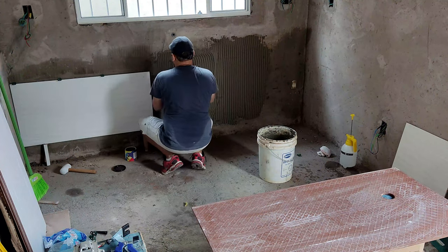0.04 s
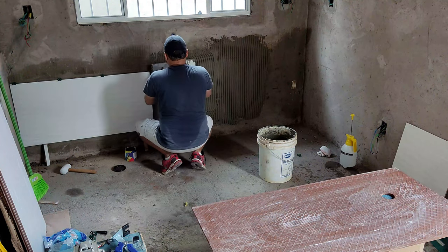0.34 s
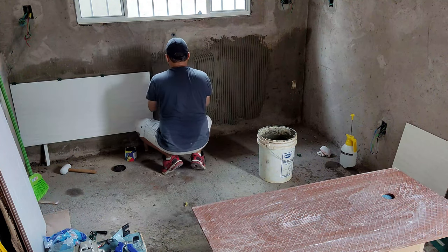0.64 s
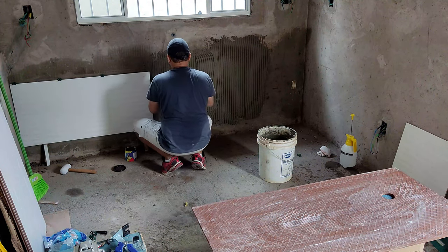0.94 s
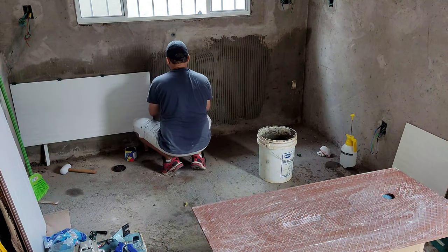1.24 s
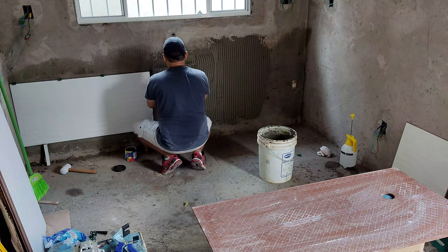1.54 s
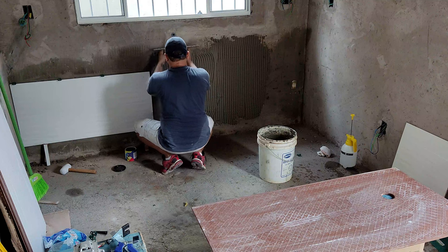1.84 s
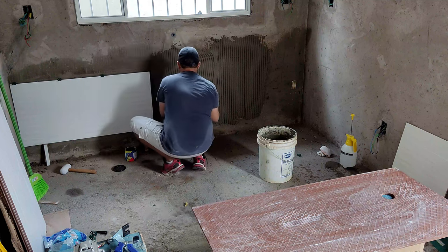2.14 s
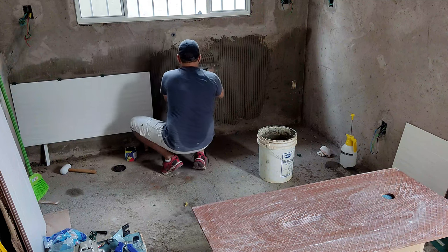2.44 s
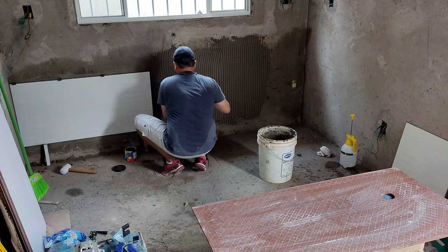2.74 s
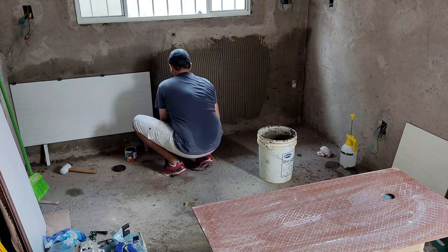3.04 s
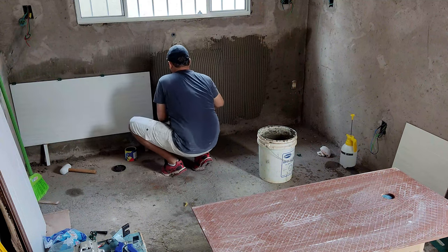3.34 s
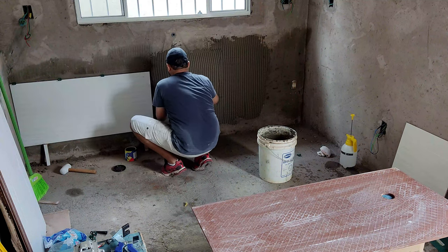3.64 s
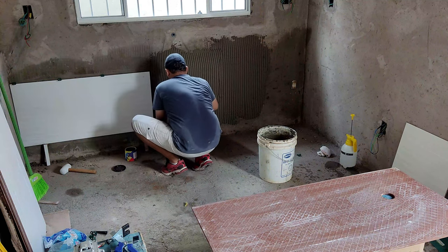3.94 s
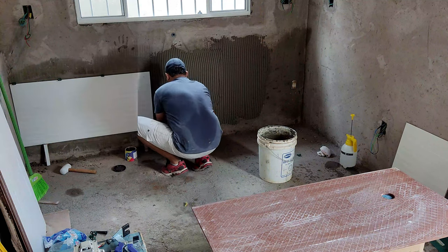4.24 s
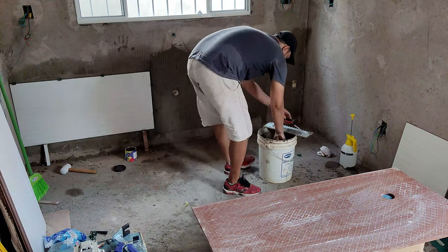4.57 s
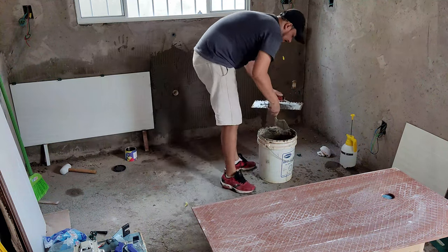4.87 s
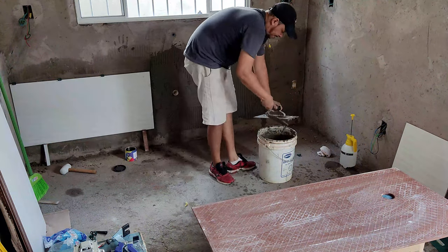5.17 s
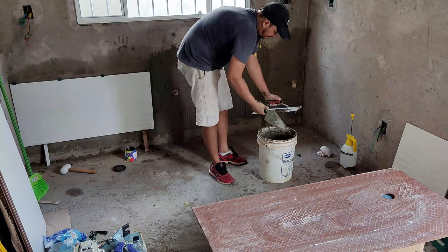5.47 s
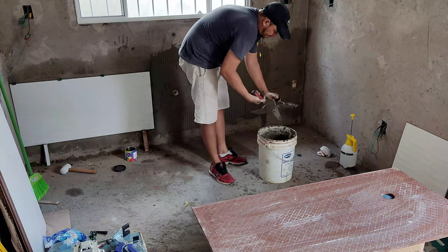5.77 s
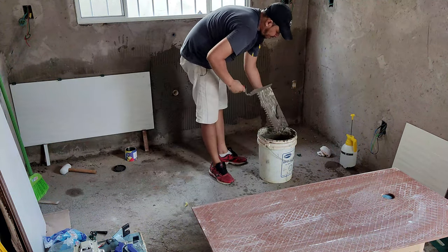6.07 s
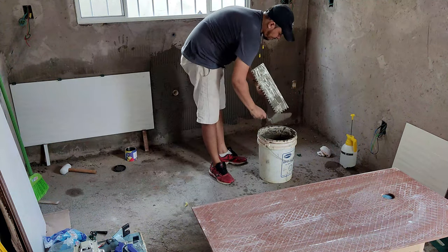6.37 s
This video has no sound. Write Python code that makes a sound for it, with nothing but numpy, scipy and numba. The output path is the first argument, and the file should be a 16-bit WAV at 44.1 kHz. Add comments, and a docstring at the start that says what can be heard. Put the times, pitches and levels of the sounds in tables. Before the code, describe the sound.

A notched steel trowel scrapes gritty mortar across a wall, then two trowels scrape and clink together in a bare room.

```python
"""Tiler in a bare plastered room

A few metres from two microphones, a notched steel trowel combs sandy mortar onto the wall: sand cracks, steel
rasps and wet mortar drags as the blade sticks and slips. The sound drops out for a moment; after a dull thump,
the tiler scrapes one trowel with another over the bucket and the blades clink. Low rumble from outdoors booms
in the room; each microphone has its own treble resonance."""
import sys
import numpy as np
from scipy import signal
from scipy.fft import rfft, irfft, next_fast_len
from scipy.io import wavfile
from scipy.ndimage import uniform_filter1d
from numba import njit

SR = 44100
rng = np.random.default_rng(int(sys.argv[2]) if len(sys.argv) > 2 else 0)


def log_audio(samples):
    """Write samples as a 16-bit WAV file to the path given in sys.argv[1]."""
    # one column per channel
    frames = np.atleast_2d(samples).T
    # limit to full scale, then quantise
    limited = np.clip(frames, -1, 1)
    pcm = np.round(limited * 32767).astype(np.int16)
    wavfile.write(sys.argv[1], SR, pcm)


N = 282681
TIME = np.arange(N) / SR


def from_db(db):
    """Decibels to gain."""
    return 10 ** (np.asarray(db) / 20)


def unit_power(x):
    """Scale to a mean square of one."""
    return x / np.sqrt(np.mean(x ** 2) + 1e-20)


def decay(t, t60):
    """A fade that loses 60 dB in t60 seconds."""
    return np.exp(-np.log(1000) * t / t60)


def in_time(curve):
    """Read a (time, value) curve at every sample."""
    return np.interp(TIME, *np.transpose(curve))


def at_hz(curve, hz):
    """Read a (frequency, value) curve on a log-frequency axis."""
    frequencies, values = np.transpose(curve)
    return np.interp(np.log(np.maximum(hz, 1)), np.log(frequencies), values)


def colour(x, spectrum):
    """Filter a steady signal by a spectral shape, then scale it to unit power."""
    size = next_fast_len(N)
    gain = from_db(at_hz(spectrum, np.arange(size // 2 + 1) * SR / size))
    return unit_power(irfft(rfft(x, size) * gain, size)[..., :N])


def drift(rate_hz):
    """Smooth random wander with a spread of about one."""
    hop, settle = 40, 2000
    pole = np.exp(-2 * np.pi * rate_hz * hop / SR)
    noise = rng.standard_normal(N // hop + settle + 2)
    slow = signal.lfilter([1], [1, -2 * pole, pole * pole], noise)[settle:]
    return np.interp(np.arange(N) / hop, np.arange(len(slow)), unit_power(slow))


# Spectral shape of the empty room's air: (frequency [Hz], relative level [dB])
AIR_SPECTRUM = [(15, 0), (35, 6.5), (60, -1), (120, 0), (200, -9.5), (320, -13), (500, -20), (1000, -21.5),
                (2000, -29.5), (4000, -28.5), (14000, -43.5)]


def still_air(level_db):
    """Room tone: steady, deep noise, separate at each microphone."""
    return from_db(level_db) * colour(rng.standard_normal((2, N)), AIR_SPECTRUM)


def hum(hz, wander_hz, waver_db, apart_rad):
    """A wavering low tone stands in the room and meets the two microphones out of step."""
    phase = 2 * np.pi * np.cumsum(hz + wander_hz * drift(8.7)) / SR
    tone = np.sin([phase, phase + apart_rad])
    return unit_power(tone * from_db(waver_db * drift(12)))


# Pitch of the engine outdoors: (time [s], frequency [Hz])
ENGINE_PITCH = [(0, 160), (.3, 168), (.6, 153), (1.0, 154), (1.4, 163), (2.0, 168), (2.25, 152), (2.6, 156),
                (2.9, 140), (3.3, 165), (3.8, 171), (4.4, 152), (5.2, 150), (6.4, 165)]
# The engine as heard indoors: (time [s], level [dB])
ENGINE_LEVEL = [(0, -53.5), (.5, -56), (.65, -48), (1, -51.5), (1.2, -56.5), (1.6, -66.5), (2.15, -69),
                (2.23, -49.5), (2.45, -54.5), (2.8, -54.5), (3.4, -61), (3.72, -55), (4.2, -71),
                (5.02, -64.5), (5.11, -55.5), (5.4, -91), (5.95, -70), (6.41, -64)]


def far_engine():
    """An engine drones in the distance, rising and falling."""
    drone = hum(in_time(ENGINE_PITCH), wander_hz=2.5, waver_db=4.0, apart_rad=1.0)
    return from_db(in_time(ENGINE_LEVEL)) * drone


# The room's boom at the microphones: (time [s], level [dB])
BOOM_LEVEL = [(0, -54), (.45, -51.5), (.75, -68), (1.4, -82), (2.1, -69), (2.33, -41.5), (2.52, -55),
              (2.72, -46), (3.5, -65.5), (4.2, -50.5), (4.42, -74), (4.8, -53), (4.92, -49.5), (5.15, -45),
              (5.65, -62), (6.41, -52.5)]
BOOM_HZ = 89


def room_boom():
    """Outdoor rumble booms in a low mode of the room."""
    return from_db(in_time(BOOM_LEVEL)) * hum(BOOM_HZ, wander_hz=2.39, waver_db=3.0, apart_rad=2.23)


def boom_swell(start_s, attack_s, length_s, release_s, level_db, sag_db_per_s):
    """A tone at the pitch of the boom swells after the first knock, sags and dies away."""
    age = np.maximum(TIME - start_s, 0)
    envelope = np.minimum(age / attack_s, 1) * np.exp(-np.maximum(age - length_s, 0) / release_s)
    tone = hum(BOOM_HZ, wander_hz=0.49, waver_db=3.0, apart_rad=0.095)
    return from_db(level_db - sag_db_per_s * age) * envelope * tone


# Dull knocks of feet and bucket: (time [s], gain [dB])
KNOCKS = [(4.48, 1), (6.126, -10)]
# Low modes that a knock rings: (frequency [Hz], level [dB], t60 [s])
KNOCK_MODES = [(129, -56, 0.94), (181, -78, 0.41), (239, -50, 0.38), (270, -54, 0.43), (296, -45, 0.27),
               (311, -52.5, 0.21), (357, -53.5, 0.27)]


def knocks(scuff_db, scuff_s):
    """Each knock rings low modes, alike at both microphones, with a short scuff of dust."""
    out = np.zeros((2, N))
    dust_spectrum = [(200, -1.5), (900, -2), (1600, -38), (5000, -21), (14000, -26)]
    dust = colour(rng.standard_normal((2, N)), dust_spectrum)
    for start_s, blow_db in KNOCKS:
        at = int(start_s * SR)
        t = TIME[:N - at]
        ring = sum(from_db(db) * np.sin(2 * np.pi * hz * t) * decay(t, t60)
                   for hz, db, t60 in KNOCK_MODES)
        scuff = from_db(scuff_db) * dust[:, at:] * np.exp(-t / scuff_s)
        out[:, at:] += from_db(blow_db) * (ring + scuff)
    return out


# Reverberation between the bare plaster walls: (frequency [Hz], t60 [s])
PLASTER_T60 = [(250, 0.47), (800, 0.27), (2000, 0.29), (5500, 0.25), (12000, 0.17)]


def room(x, direct_db, early_db, tail_db, early_s, echoes_per_s):
    """From a few metres off: weak direct sound, a spray of wall echoes and a diffuse tail."""
    size, hop, pool = 12000, 1800, 2 * SR  # samples
    t, edges_hz = TIME[:size], np.geomspace(100, 18000, 7)
    bands, fades = [], []
    for low, high in zip(edges_hz, edges_hz[1:]):
        bandpass = signal.butter(2, (low, high), "band", fs=SR, output="sos")
        bands.append(signal.sosfilt(bandpass, rng.standard_normal((2, pool))))
        fades.append(decay(t, at_hz(PLASTER_T60, np.sqrt(low * high))))
    echoes = rng.choice([-1, 1], (2, pool)) * (rng.random((2, pool)) < echoes_per_s / SR)
    out = np.zeros((2, N + 2 * hop + size))
    # each position of the blade has its own echoes; neighbouring positions cross-fade
    for centre in range(0, N + hop - 1, hop):
        start = rng.integers(pool - size)
        tail = sum(band[:, start:start + size] * fade for band, fade in zip(bands, fades))
        early = echoes[:, start:start + size] * np.exp(-t / early_s)
        response = sum(from_db(db) * part / np.linalg.norm(part, axis=1, keepdims=True)
                       for db, part in [(tail_db, tail), (early_db, early)])
        # the direct sound reaches the two microphones a few samples apart
        response[[0, 1], rng.integers(0, 24, 2)] += from_db(direct_db)
        span = np.arange(max(centre - hop, 0), min(centre + hop, N))
        piece = x[span] * np.cos(np.pi / 2 * (span - centre) / hop)
        wet = signal.fftconvolve(piece[None], response, axes=1)
        out[:, span[0]:span[0] + wet.shape[1]] += wet
    return out[:, :N]


# The two blades meet over the bucket: (time [s], gain [dB])
BLADE_CLINKS = [(5.075, -1), (5.1, -4), (5.258, -3.5), (5.684, -19), (6.245, -14), (6.368, 0.5)]
# Modes of the hand-held blade: (frequency [Hz], relative level [dB], t60 [s])
STEEL_MODES = [(842, -29, 0.08), (1240, -45, 0.056), (1910, -29.5, 0.029), (2442, -23, 0.028),
               (2624, -29.5, 0.058), (2760, -28, 0.036), (3140, -35, 0.039)]


def clinks(rise_s, vary_db):
    """Steel meets steel through a film of mortar; each meeting rings the modes differently."""
    out, t = np.zeros(N), TIME[:SR // 4]
    rise = 1 - np.exp(-t / rise_s)
    for start_s, blow_db in BLADE_CLINKS:
        ring = np.zeros(len(t))
        for hz, db, t60 in STEEL_MODES:
            gain = from_db(blow_db + db + vary_db * rng.normal())
            ring += gain * np.sin(2 * np.pi * (hz * t + rng.random())) * decay(t, t60)
        at = int(start_s * SR)
        out[at:at + len(t)] += (rise * ring)[:N - at]
    return out


# The blade touches down: (time [s], grit level [dB], rasp level [dB], drag level [dB])
BLADE_TOUCHES = [(0.21, -53, -53.5, -48), (0.57, -41.5, -34, -35.5), (0.805, -51, -30, -46),
                 (1.224, -66.5, -90, -80), (2.266, -71, -56.5, -52), (2.828, -42, -41.5, -55),
                 (3.504, -64, -44, -54), (4.251, -55, -50, -74), (4.665, -66, -60, -54),
                 (4.939, -54, -46, -42), (5.081, -47, -37, -41), (5.254, -40, -34, -34.5),
                 (5.403, -47, -40, -42), (5.683, -46.5, -49, -42.5), (5.862, -36, -55, -44),
                 (6.247, -50, -54, -41.5)]


def touches(cushion_s):
    """Power of grit, rasp and drag as mortar cushions each touch: a quick swell and fade."""
    power = np.zeros((3, N))
    for time_s, *levels_db in BLADE_TOUCHES:
        at = int((time_s - cushion_s) * SR)
        age = TIME[:min(SR // 8, N - at)] / cushion_s
        power[:, at:at + len(age)] += from_db(levels_db)[:, None] ** 2 * age ** 2 * np.exp(-age)
    return power


# Strokes along the wall, across the room: (time [s], length [s], attack [s],
# grit level [dB], rasp level [dB], drag level [dB], swell from start to end [dB])
WALL_COMBING = [(-.1, 0.11, .03, -21, -24.5, -22, -5), (0.234, .12, 0.042, -29.5, -34, -31, 5.5),
                (.487, 0.078, 0.024, -52.5, -55.5, -52.5, 0.5), (0.777, 0.13, 0.043, -33.5, -39.5, -35, 11),
                (1.335, 0.057, 0.035, -62, -67, -60.5, -3), (1.406, 0.18, 0.02, -46.5, -56, -50.5, 15),
                (1.471, 0.42, 0.049, -31, -37.5, -32.5, 4.5), (1.99, 0.093, .03, -65, -64, -69, -5),
                (2.1, 0.065, .025, -56.5, -59, -82, 17), (2.203, 0.11, 0.023, -64, -69, -81, -5),
                (2.328, 0.073, 0.052, -44.5, -46, -42.5, 2.5),
                (2.371, 0.2723, 0.061, -26.5, -32.5, -29.5, -2), (2.643, 0.047, 0.02, -34.5, -45, -44, -4),
                (2.832, 0.11, 0.028, -52, -49, -61, -16), (2.934, 0.16, .03, -44, -45, -75, -1),
                (3.1, 0.28, .03, -56, -58, -85, -21), (3.397, 0.063, 0.043, -60, -66, -79, -3),
                (3.616, 0.17, 0.019, -70.5, -72, -74, -6), (3.817, .14, 0.03, -52.5, -53.5, -53.5, 15),
                (3.971, 0.061, 0.023, -51, -53, -56, 1), (4.286, 0.12, 0.028, -44.5, -48.5, -44, 9.5)]
# Blade wiped along blade over the bucket: same columns
BUCKET_WIPES = [(4.478, 0.043, .005, -77, -64, -58.5, -8), (4.67, 0.12, .03, -63, -61.5, -66, 7),
                (4.81, 0.3, 0.019, -70.5, -62.5, -66, 4), (4.925, 0.033, 0.016, -53, -45, -58, -6),
                (5.076, .05, 0.016, -45, -41.5, -45.5, -4.5), (5.165, 0.093, 0.03, -45, -47.5, -48, 24),
                (5.3, 0.1, 0.012, -48.5, -54, -52, 7), (5.43, 0.11, .015, -61.5, -65, -67.5, -10),
                (5.54, 0.047, 0.021, -50.5, -48.5, -62, -12), (5.69, 0.038, 0.032, -41, -48, -48.5, 8),
                (5.822, 0.096, 0.074, -37, -38.5, -40.5, -3), (5.94, .15, .02, -65.5, -64, -68, 2),
                (6.093, 0.024, 0.017, -54, -55.5, -65, 1), (6.232, .2, 0.097, -32, -31.5, -39, 0)]
# Time constants of the fade as the blade lifts: (grit [s], rasp [s], drag [s])
LIFT_S = [0.0088, 0.016, 0.014]


def strokes(dig_db, dig_s):
    """Power of grit, rasp and drag as each stroke bites, swells or eases with the arm, and lifts."""
    t = TIME[::20]
    power = np.zeros((3, len(t)))
    for start, length, attack, *levels_db, swell_db in list(WALL_COMBING) + list(BUCKET_WIPES):
        age = t - start
        bite = np.sin(np.pi / 2 * np.clip(age / attack, 0, 1)) ** 2
        # the blade digs deeper as it lands and as it is flicked off; dig_db shifts each layer
        landing = np.exp(-((age - attack) / dig_s) ** 2)
        flick = np.exp(-((age - length) / dig_s) ** 2)
        dig = np.maximum(landing, flick)
        progress = np.clip(age / length, 0, 1)
        pressure = from_db(swell_db * (progress - .5) + np.outer(dig_db, dig - .5))
        lift = np.exp(-np.maximum(age - length, 0) / np.array(LIFT_S)[:, None])
        power += (from_db(levels_db)[:, None] * bite * pressure * lift) ** 2
    return np.array([np.interp(TIME, t, layer) for layer in power])


def grains(per_s, spread_db):
    """Sand grains crack under the steel at random: many small, a few large."""
    sizes = from_db(spread_db * np.minimum(rng.exponential(1, N), 5))
    signs = rng.choice([-1, 1], N)
    return unit_power(sizes * signs * (rng.random(N) < per_s / SR))


@njit
def damped_blade(force, hz, width_hz):
    """Wet mortar damps the blade into one broad resonance: the speed of a spring of changing stiffness."""
    step, damping = 2 * np.pi * hz / SR, 2 * np.pi * width_hz / SR
    out, position, speed = np.zeros(len(force)), 0., 0.
    for i in range(len(force)):
        speed += force[i] - damping * speed - step[i] * position
        position += step[i] * speed
        out[i] = speed
    return out


# Spectral shapes of sand grit, steel rasp and mortar drag: (frequency [Hz], relative level [dB])
GRIT_SPECTRUM = [(1800, -59.5), (3000, -3), (4000, -4.5), (5500, -2.5), (7000, -0.5), (10000, -1),
                 (12000, -2.5), (14000, -6.5)]
RASP_SPECTRUM = [(700, -18.5), (1200, -7.5), (1600, -7), (2200, -1.5), (2800, 0), (3500, -4), (5000, -6),
                 (9000, -19)]
DRAG_SPECTRUM = [(60, -9), (200, -0.5), (300, -4), (420, -8), (560, 0), (750, -2.5), (1300, 1.5), (2000, 2),
                 (4000, -17)]
# Blade resonance, sinking midway through long strokes and shifting with grip: (time [s], frequency [Hz])
BLADE_RESONANCE = [(0, 940), (.27, 766), (.9, 830), (1.5, 694), (1.68, 625), (1.87, 875), (2.44, 926),
                   (2.57, 750), (3.0, 1240), (3.95, 890), (4.4, 843), (4.67, 713), (5.1, 988), (5.7, 800),
                   (6.4, 954)]


def trowel(slip_db, slip_hz, lurch_db):
    """The scrape at the blade itself: grit, rasp and drag all follow the steel as it sticks and slips."""
    power = strokes(dig_db=[-0.4, 0.5, 2], dig_s=0.024) + touches(cushion_s=0.0041)
    grit_gain, rasp_gain, drag_gain = np.sqrt(power)
    slips = unit_power(from_db(slip_db * drift(slip_hz) + lurch_db * drift(25)))
    grit = colour(slips * grains(per_s=5000, spread_db=2.0), GRIT_SPECTRUM)
    rasp = colour(slips * grains(per_s=4000, spread_db=1.5), RASP_SPECTRUM)
    friction = slips * grains(per_s=2500, spread_db=1.5)
    drag = colour(damped_blade(friction, in_time(BLADE_RESONANCE), width_hz=470), DRAG_SPECTRUM)
    return grit_gain * grit + rasp_gain * rasp + drag_gain * drag


def scene():
    """At the microphones: trowels a few metres across the room, over knocks, rumble and still air."""
    blades = trowel(slip_db=3.5, slip_hz=385, lurch_db=0.2) + clinks(rise_s=0.001, vary_db=1.0)
    tiling = room(blades, direct_db=-10.5, early_db=-6.5, tail_db=-2.5, early_s=0.022, echoes_per_s=600)
    air = still_air(level_db=-55)
    thumps = knocks(scuff_db=-45.0, scuff_s=0.02)
    rumble = far_engine() + room_boom()
    swell = boom_swell(start_s=4.48, attack_s=0.055, length_s=0.31, release_s=0.04,
                       level_db=-38, sag_db_per_s=19.5)
    return air + rumble + swell + thumps + tiling


# Resonances of the left and right microphone ports: (frequency [Hz], width [Hz], boost [dB])
MICROPHONE_PORTS = [(11270, 1440, 16.5), (8850, 940, 16.5)]
SILENCE_START_S, SILENCE_END_S, CUTOFF_HZ = 4.447, 4.478, 14300


def record(dry):
    """Each port rings in the treble; the sound drops out between wall and bucket; the top is cut."""
    channels = []
    for x, (hz, width_hz, boost_db) in zip(dry, MICROPHONE_PORTS):
        ring = signal.lfilter(*signal.iirpeak(hz, hz / width_hz, fs=SR), x)
        channels.append(x + (from_db(boost_db) - 1) * ring)
    audible = (TIME < SILENCE_START_S) | (TIME > SILENCE_END_S)
    gate = uniform_filter1d(audible.astype(float), size=60)
    lowpass = signal.ellip(12, .1, 80, CUTOFF_HZ, fs=SR, output="sos")
    return signal.sosfilt(lowpass, np.array(channels) * gate)


dry = scene()
out = record(dry)
log_audio(out)
```